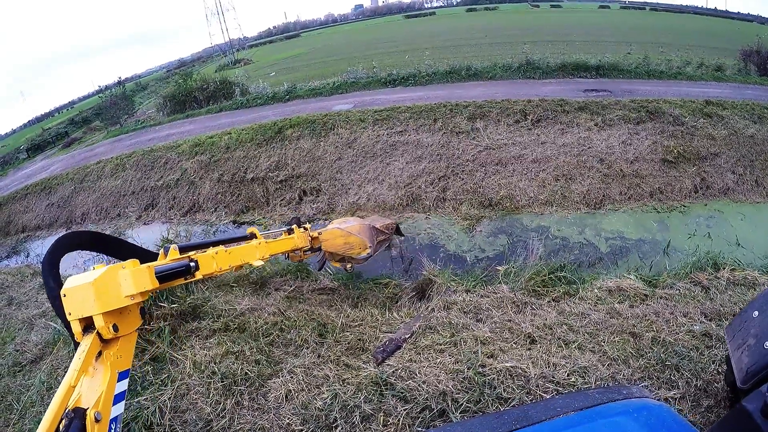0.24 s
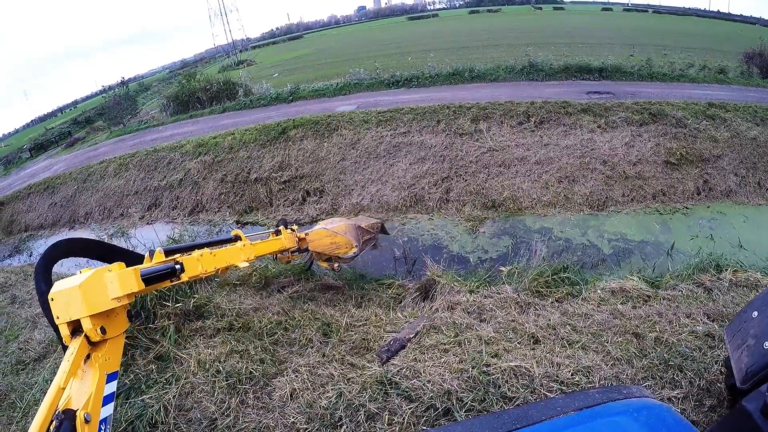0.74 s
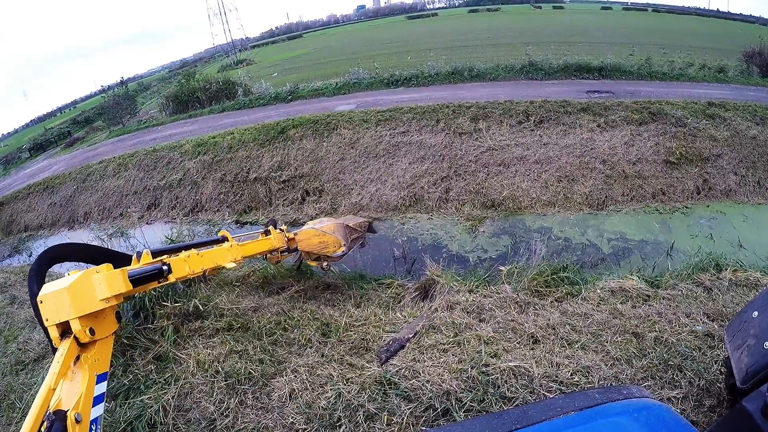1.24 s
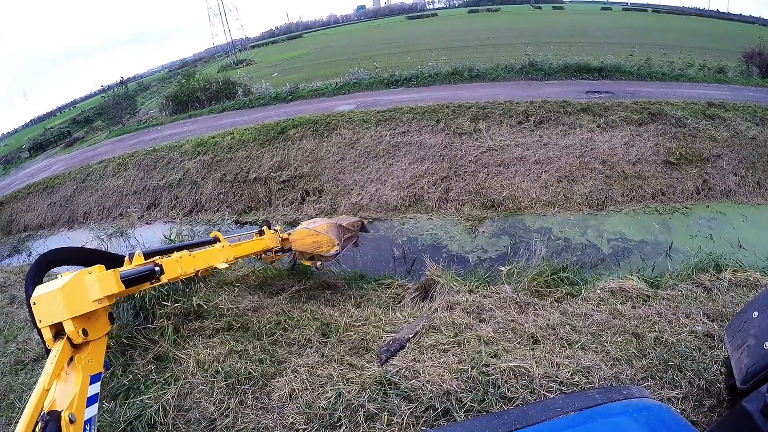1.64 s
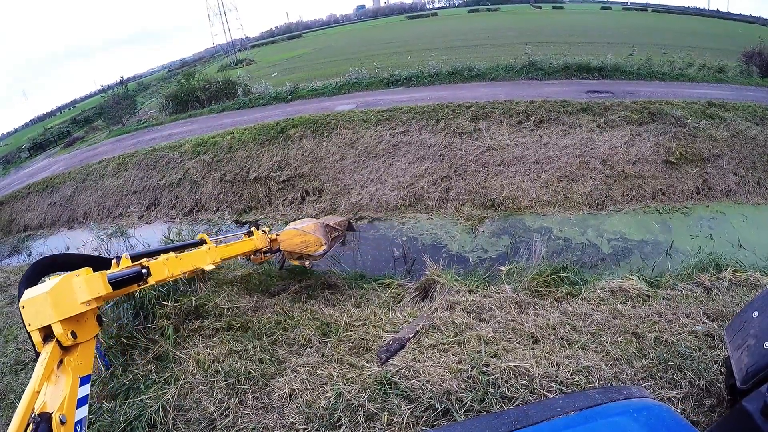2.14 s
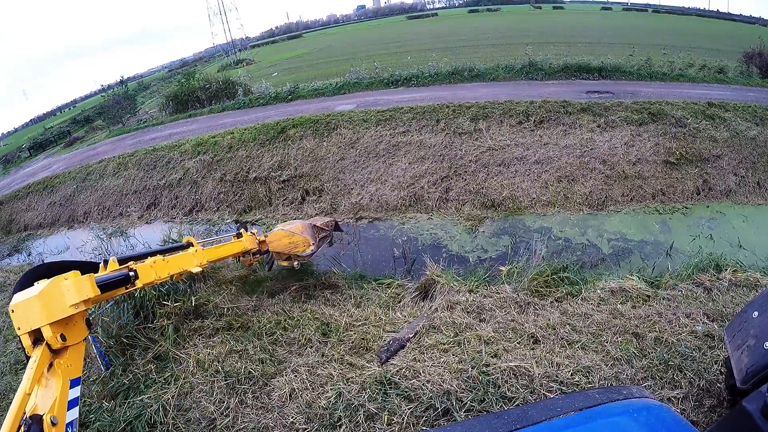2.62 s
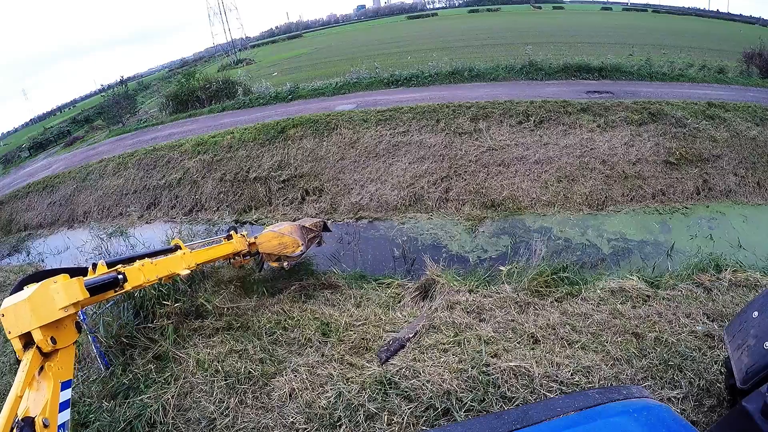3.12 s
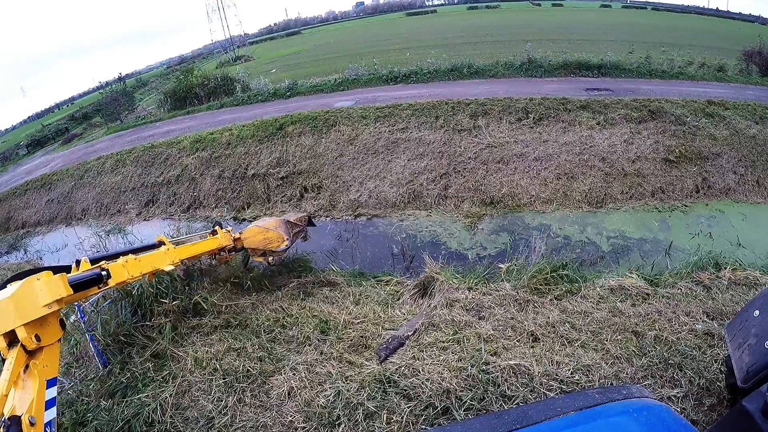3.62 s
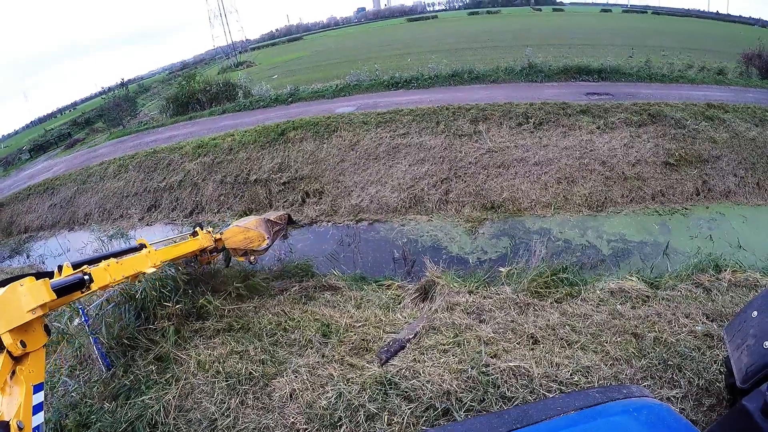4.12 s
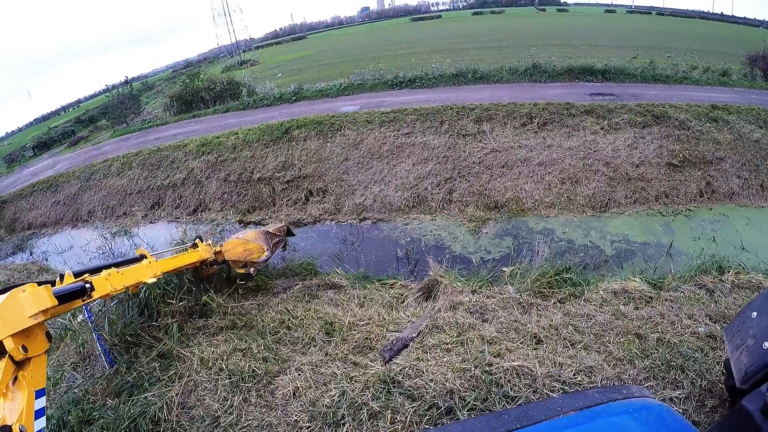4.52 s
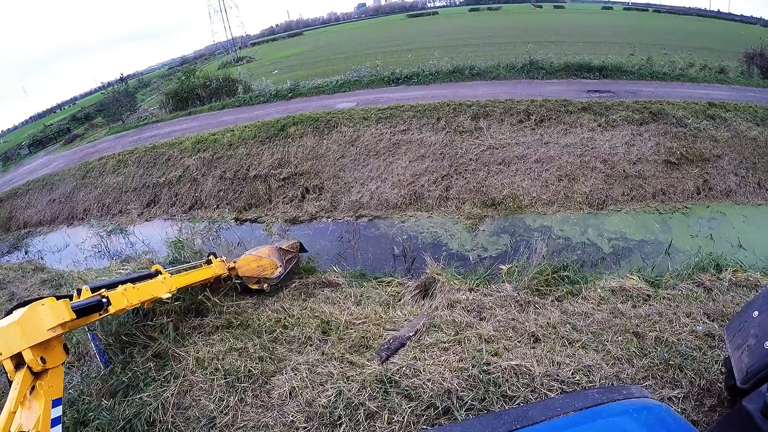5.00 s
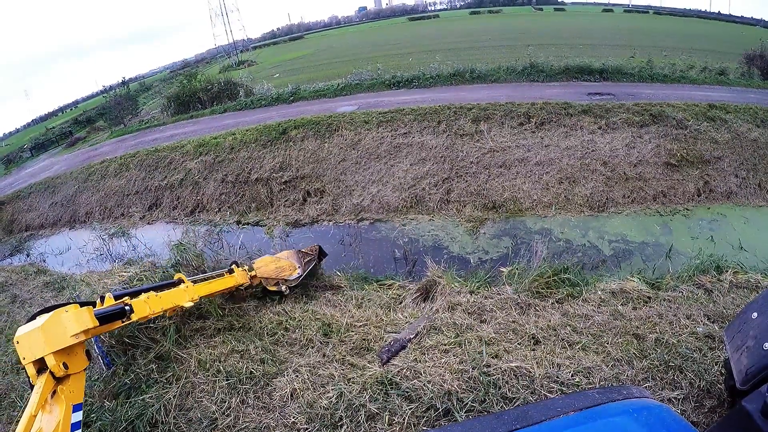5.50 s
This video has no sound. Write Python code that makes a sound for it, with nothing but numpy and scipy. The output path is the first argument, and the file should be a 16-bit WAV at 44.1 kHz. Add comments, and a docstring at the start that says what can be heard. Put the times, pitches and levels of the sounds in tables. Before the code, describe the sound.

A tractor with a reach-arm flail mower works along a ditch bank, heard from one microphone on the cab in the open. Throughout, a four-cylinder diesel holds its revs: a deep boom near 104 hertz, slightly wavering, with quieter engine tones, fan hum, thin rough gear whines and a hydraulic whine, over a broad roar of fan, panels and flails. At the start a light grassy crackle fades within 0.3 seconds; a stalk ticks at 0.2 and 0.5, with a dull arm knock at 0.4. From 0.5 to 4.4 it is mostly steady drone, the boom weakening near 3.9. A gear whine stands out around 4.4 as thicker grass begins: crackle and scattered sharp ticks, with low wind rumble swelling at 4.5 to 4.8. The boom sags and almost vanishes around 5.1 to 5.3, then quickly returns, while crackle grows until the end at 5.75.

```python
"""In a field, on the cab of a tractor mowing grass: a four-cylinder diesel holds its revs.
Sines locked to the engine make a wavering boom (second firing harmonic) and quieter tones; fan and gears hum.
Gears and a hydraulic motor sing thinly, as wavering sines, over a roar of noise from fan, panels and flails.
Low noise makes the wind rumble. Bursts of noise make cut stalks tick, and crackle when the flails bite
thicker grass; one short noise in a narrow band is a dull knock in the arm."""
import sys
import numpy as np
from scipy import signal
from scipy.fft import rfft, irfft
from scipy.io import wavfile
from scipy.ndimage import uniform_filter1d

SR = 44100
rng = np.random.default_rng(int(sys.argv[2]) if len(sys.argv) > 2 else 0)


def waveform_to_disk(signal):
    """Save audio, clipped to [-1, 1], as 16-bit WAV at the path in sys.argv[1]."""
    frames = np.transpose(np.atleast_2d(signal))
    scaled = np.clip(frames, -1, 1) * 32767
    samples = np.round(scaled).astype(np.int16)
    wavfile.write(sys.argv[1], SR, samples)


N = 253575  # length in samples, 5.75 s


def undb(db):
    """Turn decibels into a gain."""
    return 10 ** (np.asarray(db) / 20)


def curves(table):
    """Draw straight lines between a table's times, giving each other column sample by sample."""
    times, *columns = np.transpose(table)
    return [np.interp(np.arange(N) / SR, times, column) for column in columns]


def walk(rate):
    """Wander at random: levels held 1 / rate seconds, smoothed twice, with a spread of 1."""
    hold = int(SR / rate)
    steps = np.repeat(rng.standard_normal(N // hold + 1), hold)
    smooth = uniform_filter1d(uniform_filter1d(steps, hold), hold)[:N]
    return smooth / smooth.std()


def colour(points):
    """Give the frequencies of the spectrum and the gain at each, from (f/Hz, level/dB) points."""
    hz = np.fft.rfftfreq(N, 1 / SR) + 1e-3  # keeps the logarithm finite at zero
    f, db = np.array(points).T
    return hz, undb(np.interp(np.log(hz), np.log(f), db))


def unit(x):
    """Scale to an rms of 1."""
    return x / np.sqrt(np.mean(x ** 2))


def tones(base_hz, table, waver_db, rate, blur):
    """Add sines on multiples of a base rate, each wavering in level (dB) and phase (radians)."""
    turn = 2 * np.pi * np.cumsum(base_hz) / SR
    total = 0
    for multiple, db in table:
        gain = np.sqrt(2) * undb(db + waver_db * walk(rate))  # root 2: levels are rms
        start = 2 * np.pi * rng.random()
        total = total + gain * np.sin(multiple * turn + start + blur * walk(rate))
    return total


CYCLE_HZ = 12.97  # one four-stroke cycle, two crank turns
BOOM_ORDER = 8  # multiple of the cycle
SAG_BELOW_DB, SAG_HZ_PER_DB = -24, 0.8  # the boom's pitch sags where it fades under this level
# how the exhaust boom rises and fades: (t/s, level/dB)
BOOM_LEVEL = [(0.04, -13.5), (0.13, -16), (0.37, -14), (0.61, -14.5), (0.67, -19.5), (0.87, -15),
              (0.98, -17), (1.61, -14.5), (1.68, -17.5), (1.87, -15.5), (2.38, -16), (2.42, -19.5),
              (2.5, -15.5), (3.76, -18.5), (3.89, -24.5), (4.27, -17.5), (4.52, -24), (4.6, -17),
              (4.73, -20), (4.86, -15), (5.06, -17), (5.11, -25.5), (5.27, -32), (5.3, -45), (5.33, -23),
              (5.37, -18), (5.64, -14), (5.75, -17.5)]
# steady tones locked to the engine: (multiple of the cycle, level/dB)
ENGINE_ORDERS = [(4, -44), (7, -47), (9, -45), (16, -50), (25, -46.5), (36, -45.5), (40, -54), (44, -47),
                 (50, -55), (84, -58), (90, -57), (95, -53), (120, -51), (125, -58), (250, -60)]


def engine():
    """The exhaust boom, plus tones locked to a crank whose speed hunts slightly."""
    boom_db = curves(BOOM_LEVEL)[0]
    gain = uniform_filter1d(undb(boom_db), int(0.015 * SR))
    hz = BOOM_ORDER * CYCLE_HZ - SAG_HZ_PER_DB * np.maximum(SAG_BELOW_DB - boom_db, 0)
    boom = np.sqrt(2) * gain * np.sin(2 * np.pi * np.cumsum(hz) / SR)
    hunting_hz = CYCLE_HZ * (1 + .0006 * walk(1.5))
    return boom + tones(hunting_hz, ENGINE_ORDERS, waver_db=1.2, rate=7, blur=.35)


# other steady tones of fan and gears: (f/Hz, level/dB)
HUM_TONES = [(269, -47), (534, -53), (1708, -57), (1870, -57), (1943, -54), (2280, -61), (2612, -57),
             (2705, -58), (2797, -57)]


def hums():
    """Steady pitches of turning fan and gears, slightly unsteady in level and phase."""
    return tones(np.ones(N), HUM_TONES, waver_db=1.8, rate=12, blur=.7)  # base of 1 Hz


SWELL_DB, SWELLS_PER_S = 2.5, 1.59  # each rough tone swells and fades alone; rate of new random levels
WHINE_HZ = 1296
# rough gear tones: (f/Hz, level/dB in thin grass, rise in dB per dB of crackle)
GEAR_TONES = [(1841, -50.5, -0.33), (2854, -50.5, 0.53), (3070, -53.5, 0.48)]
# the clearest gear tone fades, then stands out as the thick grass begins: (t/s, level/dB)
WHINE_LEVEL = [(0, -47), (.6, -47.5), (2.9, -48.5), (3.6, -55), (4.15, -46), (4.4, -43), (4.85, -45),
               (5.1, -50), (5.75, -50)]


def gears(bite_db):
    """Narrow, rough gear tones that swell slowly and shift in level as the flails bite, plus a whine."""
    levels = [(WHINE_HZ, curves(WHINE_LEVEL)[0])]
    for hz, db, rise in GEAR_TONES:
        levels.append((hz, db + rise * bite_db + SWELL_DB * walk(SWELLS_PER_S)))
    total = 0
    for hz, db in levels:
        # fast waver in level and phase makes the tone rough
        total = total + undb(db) * tones(np.ones(N), [(hz, 0)], waver_db=2.0, rate=30, blur=1.3)
    return total


# hydraulic motor: (t/s, piston rate f/Hz, effort as level/dB added to every harmonic)
MOTOR_COURSE = [(0, 405, 3), (.55, 405, 3), (1.0, 408, 0), (1.5, 410, 1), (2.2, 409.5, 0), (3, 408.3, 0),
                (4.4, 405.5, -2), (5.0, 405.5, 1), (5.75, 406, 0)]
# its harmonics: (multiple of the piston rate, level/dB before effort)
MOTOR_HARMONICS = [(1, -50), (6, -57), (15, -72), (16, -67), (17, -68), (18, -60.5), (19, -70)]


def motor():
    """A thin whine on the motor's piston rate, whose harmonics drift with the oil flow."""
    hz, effort_db = curves(MOTOR_COURSE)
    drifting_hz = hz * (1 + .0003 * walk(12))
    return undb(effort_db) * tones(drifting_hz, MOTOR_HARMONICS, waver_db=1.8, rate=4, blur=.4)


ROAR_DB = -50  # added to every level of the broad roar, giving dB per Hz
# shape of the broad roar: (f/Hz, relative level/dB)
ROAR_SHAPE = [(20, -20), (35, -16), (75, -9.5), (150, -16), (360, -17), (900, -21), (1450, -23.5),
              (2100, -26.5), (3400, -27.5), (5200, -33.5), (7700, -42), (7950, -45.5), (11000, -50.5),
              (15500, -54)]
# panels and ducts rung by the roar: (f/Hz, width in Hz, level/dB over the broad roar)
PANEL_RINGS = [(50.4, 11, 12.5), (142.5, 29, 7), (224.4, 20, 2.5), (104, 22, 9), (268, 24, 7), (467, 24, 7),
               (530, 24, 3), (572, 20, 6), (709, 75, 0.5), (1245, 140, 1), (1602, 82, 8.5), (1804, 136, 10),
               (1933, 60, 12), (2404, 300, 6.5), (2773, 490, 10), (3113, 186, 7.5), (3954, 320, 5.5),
               (4480, 560, 2.5), (7420, 83, 5)]


def roar(load_db):
    """Noise ringing the panels, in half-octave bands that flicker alone; load lifts the upper bands."""
    hz, gain = colour(ROAR_SHAPE)
    ring = 1 + sum(undb(db) ** 2 / (1 + (2 * (hz - f) / w) ** 4) for f, w, db in PANEL_RINGS)
    noise = rfft(rng.standard_normal(N)) * gain * np.sqrt(ring * SR / 2) * undb(ROAR_DB)
    place = 2 * np.log2(hz / 20)  # half octaves above 20 Hz
    shared = walk(9)  # one flicker common to the upper bands
    total = 0
    for k in range(20):
        share = np.cos(np.pi / 2 * np.clip(place - k, -1, 1)) ** 2  # neighbouring bands overlap
        high = np.clip((k - 10) / 4, 0, 1)  # 0 in low bands, 1 in high ones
        flicker_db = .45 * walk(6) + high * (.5 * shared + load_db)
        total = total + irfft(noise * share, N) * undb(flicker_db)
    return total


GUST_DB = 1  # spread of the small gusts
# wind on the microphone: (t/s, level/dB before the small gusts)
WIND_LEVEL = [(0, -46), (.42, -43), (.49, -34), (.66, -41), (3.2, -44), (3.95, -34), (4.11, -40),
              (4.32, -41), (4.45, -27), (4.74, -25), (5.1, -41), (5.29, -32), (5.4, -42), (5.75, -40)]


def wind():
    """Low, gusty rumble: noise around 16 to 24 Hz, evened out, then given its gusts."""
    band = signal.butter(2, [16, 24], "band", fs=SR, output="sos")
    low = signal.sosfilt(band, rng.standard_normal(N))
    even = unit(low / np.sqrt(uniform_filter1d(low ** 2, int(.3 * SR))))
    return even * undb(curves(WIND_LEVEL)[0] + GUST_DB * walk(3.88))


# flails in the grass: (t/s, crackle level/dB of the part over 8.2 kHz)
CUT_LEVEL = [(0.0, -53), (0.32, -59.5), (4.42, -61.5), (4.47, -55.5), (4.63, -54.5), (5.56, -50.5),
             (5.75, -47.5)]
# colour of the crackle: (f/Hz, relative level/dB)
CRACKLE_COLOUR = [(2060, -44), (3500, -47), (3630, -17), (4030, -0.5), (5880, -8), (7320, -2),
                  (8080, -11.5), (9940, -11), (15000, -21)]


def crackle():
    """Dense small snaps of cut stems with short tails, merging into a hiss."""
    chance = rng.random((N, 2))
    happens = chance[:, 0] < 150 / SR  # about 150 snaps a second
    size = np.minimum(undb(-3.0 * np.log(chance[:, 1] + 1e-9)), 3)
    tail = signal.lfilter([1], [1, -np.exp(-1 / (0.0048 * SR))], happens * size)
    hz, gain = colour(CRACKLE_COLOUR)
    burst = rfft(rng.standard_normal(N) * (3.5 + tail)) * gain  # 3.5 is the steady hiss
    top = irfft(burst * (hz > 8200), N)
    return irfft(burst, N) / top.std() * undb(curves(CUT_LEVEL)[0])


SOFT_TICK_DB, DULL_DB_PER_DB = -31, 1.1  # harder blows sound duller: dB per octave for each dB over a soft tick
# single stalks struck: (t/s, rough peak level/dB, time to fall 60 dB in s, ring level/dB added to the hood)
STALK_TICKS = [(0.233, -33.5, 0.089, 4), (.474, -29.5, 0.12, 5), (4.436, -24.5, .06, 0),
               (4.457, -27.5, 0.083, -2), (4.534, -31.5, .06, .1), (4.562, -32, .06, 2),
               (4.62, -32, .08, 2), (4.651, -34, .07, 3), (4.667, -32, .12, -5), (4.737, -32, .06, 4),
               (4.779, -27.5, .07, 4), (4.834, -24, 0.076, -8), (4.97, -35, 0.2, -3), (5.103, -32, .1, 2),
               (5.168, -22.5, 0.1, 12), (5.19, -30, .14, -3), (5.294, -32, .06, -2), (5.406, -27, .05, 3),
               (5.435, -28, .06, -3), (5.544, -29.5, .08, 2), (5.603, -26, 0.099, 6), (5.709, -35, .08, 6)]
# flail hood rattled by a stalk: (f/Hz, width in Hz, level/dB before each tick's own ring)
HOOD_RINGS = [(4060, 92, 8.5), (5000, 370, 2.5), (6100, 380, 0.5), (7450, 400, 5), (9700, 400, -2),
              (12400, 370, -7), (14200, 600, -12)]


def ticks():
    """Each struck stalk is a quick burst of debris noise, coloured by the ringing hood."""
    out, t = np.zeros(N + SR), np.arange(SR // 4) / SR
    hz = np.fft.rfftfreq(len(t), 1 / SR) + 1
    for start, db, t60, ring_db in STALK_TICKS:
        tilt_db = -DULL_DB_PER_DB * max(db - SOFT_TICK_DB, 0)
        spot = rng.standard_normal(len(HOOD_RINGS))  # every blow lands on another spot
        ring = 0
        for (f, width, hood_db), luck in zip(HOOD_RINGS, spot):
            ring = ring + undb(hood_db + ring_db + 2.0 * luck) ** 2 / (1 + (2 * (hz - f) / width) ** 2)
        debris = 0.24 * (hz > 3500)
        tilt = undb(tilt_db * np.log2(np.maximum(hz, 3500) / 7500))
        gain = np.sqrt(ring + debris) * tilt
        sound = unit(irfft(rfft(rng.standard_normal(len(t))) * gain, len(t)))
        shape = (1 - np.exp(-t / .0015)) * np.exp(-np.log(1000) * t / t60)
        first = int(start * SR)
        out[first:first + len(t)] += undb(db) / 2 * shape * sound  # noise peaks at about twice its rms
    return out[:N]


# a dull knock in the arm: (t/s, rough peak level/dB, f/Hz just below its band, time to fall 60 dB in s)
ARM_KNOCK = (.37, -31, 1000, .15)


def knock():
    """A short thud: noise in a narrow band, rising quickly and dying away."""
    start, db, hz, t60 = ARM_KNOCK
    t = np.maximum(np.arange(N) / SR - start, 0)
    band = signal.butter(2, [1.04 * hz, 1.1 * hz], "band", fs=SR, output="sos")
    noise = unit(signal.sosfilt(band, rng.standard_normal(N)))
    shape = (1 - np.exp(-t / 0.0038)) * np.exp(-np.log(1000) * t / t60)
    return undb(db) / 2 * shape * noise


IDLE_CUT_DB = -61  # crackle level in thin grass
IDLE_LIFT_DB, ROAR_DB_PER_CUT_DB = -0.72, 0.14  # thicker grass lifts the roar's upper bands


def scene():
    """Add up all sources at one microphone in the open."""
    bite_db = curves(CUT_LEVEL)[0] - IDLE_CUT_DB
    load_db = IDLE_LIFT_DB + ROAR_DB_PER_CUT_DB * bite_db
    machine = engine() + hums() + gears(bite_db) + motor() + roar(load_db)
    return (machine + wind() + crackle() + ticks() + knock())[None]


TOP_HZ = 15260  # highest pitch let through


def record(dry):
    """Cut the top treble with a steep low-pass filter, applied twice."""
    cut = signal.ellip(12, .3, 70, TOP_HZ, fs=SR, output="sos")
    return signal.sosfilt(np.vstack([cut, cut]), dry)


dry = scene()
out = record(dry)
waveform_to_disk(out)
```